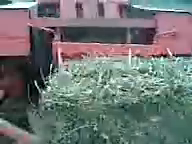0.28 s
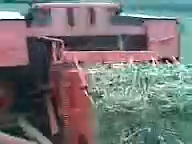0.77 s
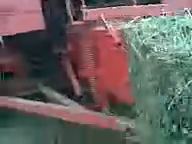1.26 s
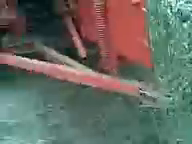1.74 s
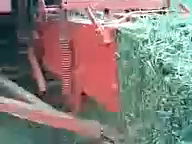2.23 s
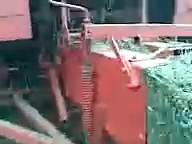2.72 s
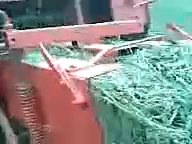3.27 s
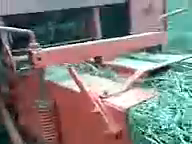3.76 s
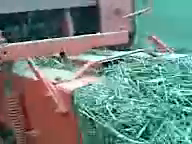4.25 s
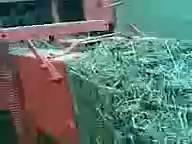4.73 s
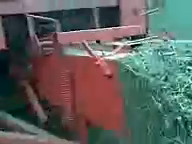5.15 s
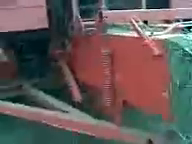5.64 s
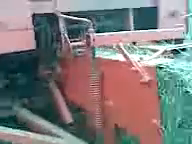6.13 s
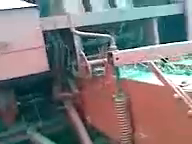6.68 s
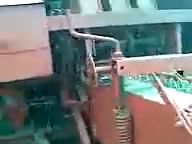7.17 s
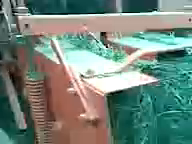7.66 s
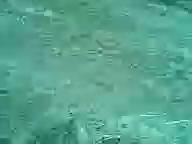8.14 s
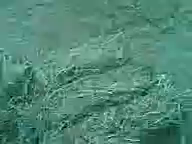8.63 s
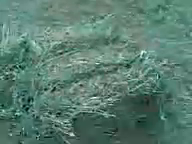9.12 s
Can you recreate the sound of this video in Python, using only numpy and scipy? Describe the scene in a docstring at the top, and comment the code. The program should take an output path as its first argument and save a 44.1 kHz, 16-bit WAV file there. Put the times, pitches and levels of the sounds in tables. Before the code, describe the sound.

A square hay baler is already running close by in a field and clatters for the whole nine and a half seconds. Metal panels rattle, chains and tines jingle, and sharp ringing clanks scatter through the noise. About every 0.7 seconds the plunger slams twice in quick succession with a hollow boom, and the rattle swells as it returns. The heaviest strokes end in a juddering, falling thump, near 1.6, 3, 4.4, 7.2, 7.9 and 8.6 seconds. Steel rubs in brief squeaks around 1.1 seconds, from 4.5 to 5.2, and again from about 7.7 to 8.1. A tractor engine drones low and faint underneath, strongest at the very start. The balance of rattles shifts slightly as the small microphone moves alongside the machine. The sound is dull, with little treble, and distorts on the hardest blows.

```python
"""A square hay baler at work, followed on foot by a small camera. Each plunger turn the machine slams twice as the hay
is packed and swells as the plunger returns: the bale chamber booms, panels rattle, chains and tines jingle, hard blows ring.
Guides squeak now and then, the tractor drones ahead. The camera is dull above 4 kHz and clips on the blows."""
import sys
import numpy as np
from scipy import signal
from scipy.fft import rfft, irfft, next_fast_len
from scipy.io import wavfile
from scipy.ndimage import map_coordinates

SR = 44100
rng = np.random.default_rng(int(sys.argv[2]) if len(sys.argv) > 2 else 0)


def wav_out(sig):
    """Save sig, one row per channel (or a flat mono array), as 16-bit PCM at SR to the path in sys.argv[1]."""
    wavfile.write(sys.argv[1], SR, np.round(np.clip(np.atleast_2d(sig).T, -1, 1) * 32767).astype(np.int16))


N = 414540

# blows: (s, peak dB, chamber dB, chains dB, t60 s, clank Hz)
BLOWS = [(0.154, -0.5, -14, -16.5, 0.089, 1081), (0.215, -7, -24, -27, 0.032, 584), (0.838, -7, -33.5, -17.5, 0.22, 1002),
         (0.943, -1, -12, -13, 0.058, 578), (1.188, -10, -5, -5, 0.067, 1250), (1.28, -6, -35, -35.5, 0.068, 1190),
         (1.549, 0.5, -29, -19.5, 0.07, 1416), (1.639, 4.5, -15.5, -10, 0.058, 908), (1.801, -6.5, -37, -11, 0.05, 1930),
         (1.942, -7, -24.5, -9, 0.05, 1384), (1.983, -9, -26.5, -27, 0.096, 1252), (2.247, -8, -17, -8.5, 0.092, 1320),
         (2.37, -3, -15, -16.5, 0.091, 1958), (2.384, -7, -9.5, -5.5, 0.051, 1250), (2.44, -7.5, -18, -6, 0.15, 786),
         (2.968, 1, -12.5, -17, 0.06, 1010), (3.007, -0.5, -13.5, -25.5, 0.09, 1123),
         (3.078, -5, -15, -13.5, 0.13, 1032), (3.324, -12, -36, -31, 0.19, 1018), (3.438, -13.5, -21, -20, 0.13, 1330),
         (3.675, -5, -10, -5, 0.085, 1417), (3.714, -2.5, -17.5, -18, 0.067, 704), (3.777, -1.5, -11, -38, 0.045, 842),
         (3.853, -5, -24, -9, 0.063, 744), (4.029, -12, -36, -9.5, 0.12, 2100), (4.06, -10.5, -19.5, -26, 0.088, 890),
         (4.387, -2.5, -8, -16, 0.15, 1490), (4.424, 1.5, 2, -16.5, 0.072, 586),
         (4.471, -7.5, -2, -4.5, 0.091, 1334), (4.524, -6.5, -20, -10, 0.078, 1054),
         (4.76, -8, -28, -16.5, 0.22, 1428), (4.797, -4.5, -20, -20, 0.13, 1352),
         (4.942, -14, -29.5, -26, 0.11, 1325), (5.059, -26, -20, -26, 0.072, 1390),
         (5.172, -4.5, -28, -6.5, 0.064, 1130), (5.415, -9, -40, -13, 0.27, 926),
         (5.884, 2, -9.5, -11.5, 0.083, 1033), (6.065, -6, -32, -14, 0.082, 1025), (6.094, -4.5, -34, -12, 0.054, 960),
         (6.125, -5.5, -34, -21, 0.13, 1075), (6.179, -7, -6, -5, 0.033, 2190),
         (6.382, -9.5, -18, -21, 0.08, 1015), (6.416, -8.5, -31, -18, 0.16, 1011), (6.493, -3, -23, -8, 0.054, 1071),
         (6.593, -10, -23, -11, 0.18, 1159), (6.621, -4.5, -5, -29, 0.071, 1135), (6.857, -6, -40, -7.5, 0.067, 1387),
         (6.946, -4.5, -25.5, -14, 0.087, 1068), (7.013, -3, -25, -21, 0.05, 1168),
         (7.215, 1, -7.5, -9.5, 0.12, 573), (7.295, -1, -3, -13, 0.12, 804),
         (7.337, 0, -4, -21.5, 0.079, 487), (7.491, -8.5, -36, -20, 0.066, 1080), (7.605, -6.5, -25.5, -17.5, 0.12, 1000), (7.67, -11.5, 0, -23, 0.055, 1186),
         (7.922, -15, -6.5, -25.5, 0.025, 1530), (7.967, 4.5, -14.5, -28, 0.045, 426), (8.048, -1, -20, -13.5, 0.069, 1463),
         (8.317, 1.5, -28, -18, 0.017, 434), 
         (8.513, -9, -19, -26.5, 0.1, 778), (8.644, 0, -16, -6.5, 0.053, 1066), (8.677, 2.5, -6.5, -31.5, 0.081, 708),
         (8.755, -6, -18, -16, 0.087, 568), (9.065, -3.5, -11, -14.5, 0.064, 756), (9.32, -13.5, -7.5, -6, 0.053, 950)]
# resonances of each part: (Hz, width Hz, dB)
CHAMBER = [(429.9, 56, -1), (531, 92, 1), (596.5, 180, 0.5), (769, 120, -1.5)]
PANELS = [(875, 195, -1.5), (974, 95, 3), (1034.5, 161, 0.5), (1175, 124, -3)]
CHAINS = [(1820, 345, -1), (2180, 368, 3), (2327, 360, 2), (2604, 260, -4)]
FIRING_HZ = 35.7
ORDERS_DB = [(2, -51.5), (3, -52), (4, -45.5), (5, -57)]  # exhaust tones: (multiple of firing rate, dB)
TRACTOR = [(0, 8.5), (1.2, -2), (2.5, -2.5), (5, -3.5), (7, -3), (9.4, -8)]  # (s, dB)
DRONE = [(15, -55.5), (25, -19), (92, 2), (168, -5.5), (243, 4), (400, -19.5), (520, -33), (880, -120)]  # (Hz, dB per Hz)
CAMERA = [(22, -10), (40, -2.5), (200, -1), (3400, 1), (3800, -3.5), (4150, -9.5), (4400, -25), (4600, -39.5), (4800, -80), (5100, -110)]  # (Hz, dB)
CLIP_AT = .705  # fixed
TOP_HZ = 15850  # fixed
FRAME = [(45, 50, -13.5), (69.6, 5.4, -6.5), (99.4, 17, -8.5), (179, 67, -5), (250.3, 75, -1.5), (358, 137, -3)]
TINES = [(2784, 348, 0.5), (3269, 324, 1), (3470, 227, 1.5), (3840, 500, -3.5), (4420, 370, -3.5)]
# steel rubbing steel for a moment: (start s, length s, Hz, width Hz, dB)
RUBS = [(0.679, 0.086, 2790, 90, -34.5), (1.081, 0.18, 3410, 350, -20), (1.083, 0.14, 2600, 600, -25), (4.451, 0.079, 1540, 50, -11.5), (4.553, 0.31, 1425, 51, -25),
        (4.783, 0.12, 1423, 50.5, -24.5), (4.873, 0.19, 1426, 38.7, -15), (5.029, 0.075, 1420, 59.5, -24), (5.164, 0.058, 2386, 121, -18.5),
        (6.324, 0.089, 1038, 61.3, -17), (6.338, 0.05, 1490, 60, -23.5), (7.678, 0.44, 1543, 60, -21.5), (7.912, 0.049, 2890, 120, -16.5),
        (6.78, 0.03, 2980, 80, -22), (8.37, 0.029, 3600, 120, -27.5)]
GUARDS = [(1256.7, 161, 0), (1410, 92, 1.5), (1484, 85, 1.5), (1642, 130, -2.5)]
# idle rattle as the camera walks round: (s, frame dB, chamber dB, panels dB, guards dB, chains dB, tines dB)
IDLE = [(0.0, -34, -29.5, -34, -34.5, -44.5, -43.5), (1.0, -50.5, -34.5, -31.5, -36.5, -48, -42.5),
        (1.2, -60, -44.5, -36, -34, -36.5, -41.5), (2.5, -44, -42, -31.0, -33.5, -28, -39),
        (4.0, -43.0, -43.5, -39.0, -37.5, -34, -40), (5.5, -36.5, -39, -32, -29.0, -28.5, -37.5),
        (7.0, -36.5, -43, -27, -29, -27.5, -40), (8.0, -37, -40, -40.5, -34, -31.5, -55),
        (8.3, -41, -28.5, -30, -46.5, -33, -35.5), (9.4, -53, -42.5, -46, -43, -33, -44)]
# packing slams, levels over the idle rattle: (s, hold s, frame dB, chamber dB, panels dB, guards dB, chains dB, tines dB)
SLAMS = [(0.155, 0.072, 6, 16, 15.5, 16.0, 9, 10), (0.263, 0.028, -8.5, 8.5, 13.5, 13.5, 16, 12),
         (0.848, 0.052, 10, 14, 10, 13.5, 11, 6), (0.95, 0.029, 8, 17.5, 13.5, 16.0, 21.5, 11),
         (1.545, 0.13, 15.5, 12.5, 7, 10.5, 5, 8.5), (1.644, 0.0092, 29.5, 32, 17.0, 20, 12, 13),
         (2.273, 0.0067, 14.5, 17, 7.5, 1.5, -14, 1), (2.372, 0.04, 12, 13.5, 9.5, 15, 5.5, 1.5),
         (2.98, 0.0086, 18.5, 28, 20.0, 10, 6.5, 12.5), (3.062, 0.068, 16.5, 11.5, 13, 11, 5, 6),
         (3.686, 0.045, 12.5, 20.5, 20.5, 11.5, 17, 12.5), (3.782, 0.041, 12, 20, 21.5, 12.5, 14.5, 7.5),
         (4.397, 0.031, 9.5, 23, 18.5, 15.5, 14, 12.5), (4.481, 0.038, 12.0, 16, 14.5, 9.5, 0.5, 7),
         (5.07, 0.024, 6.5, 13.5, 3.5, 10, -2, 3), (5.172, 0.025, 10.0, 16.5, 16.5, 9.5, 9.5, 6),
         (5.825, 0.063, 5, 16.5, 5, -8, 0.5, 5.5), (5.888, 0.0053, 9, 16.0, 14.5, 13, 10.0, 1),
         (6.498, 0.023, 13, 20.5, 6.5, 7.5, 8, 10.5), (6.589, 0.099, 6, 16.5, 7.5, 7.0, 3.5, 7),
         (7.224, 0.039, 16.5, 28, 19, 4.5, 7.5, 5), (7.292, 0.066, 15.5, 21, 13, 5, 5, 12),
         (7.932, 0.024, 17.5, 26, 17.5, 16.5, 9, 27), (8.032, 0.053, 11, 15.5, 13, 5.5, 10, 17),
         (8.654, 0.017, 19, 19.0, 23, 19.5, 16, 16), (8.74, 0.033, 16, 15, 13, 21.5, 7, 7),
         (9.345, 0.0033, 12.5, 14.5, 16.5, 4.5, 3, 9)]
# return-stroke swells, levels over the idle rattle: (peak s, rise s, frame dB, chamber dB, panels dB, guards dB, chains dB, tines dB)
SWELLS = [(0.584, 0.099, 15.5, 9, 6, 13, 13.5, 8), (1.163, 0.032, 26.5, 8, 2.5, -8, 10.5, 8),
          (1.294, 0.44, 25.5, 18, 7, 8, 1.5, 7.5), (1.4, 0.17, 11.5, -1, 7, 12, 4.5, 10.5),
          (1.996, 0.303, 15.5, 11, 15, 14.5, 5.5, 2), (2.691, 0.1, 18.5, 16.5, 13.5, 11.5, 7, 5.5),
          (3.425, 0.24, 19.5, 15.5, 16.5, 14, 5, -0.5), (3.532, 0.072, -6, 3, 14.5, 13.5, 8, 3.5),
          (4.088, 0.063, 12.5, 16, 14.5, 28, 6.5, 9.5), (4.19, 0.064, 14.5, -9, 13, 13.5, 3.5, -3.0),
          (4.794, 0.067, 11, 12.5, 13.5, 11, 1, 5.5), (4.934, 0.07, -2, 6.5, 8, 12, -6.5, -15.5),
          (5.555, 0.26, 1.5, 8, 11.5, 5.5, 4.5, 2), (6.241, 0.1, 11.5, 16, 7.5, -1, -3, 4.5),
          (6.378, 0.1, -3.5, 4, 9.5, 4.0, 4.0, 3), (6.978, 0.19, 7.5, 17, 8, 6, 2, 9),
          (7.088, 0.024, 3.5, 0, 6.5, 5.5, -19, 8.5), (7.663, 0.363, 8, 9.5, 15.5, 8.0, 1.5, 22),
          (7.795, 0.25, 11, 6.5, 14.5, 9, -9, -11), (8.382, 0.085, 14.5, 7, 7, 20.5, 4.5, 5),
          (8.504, 0.25, 4.5, 7.5, 7.5, 9.5, 4.5, -5.5), (9.038, 0.16, 15, 10.5, 14.5, 16, 3.5, 10),
          (9.175, 0.16, 16, 15, 6.5, 9, -1.5, 0)]
LOOSE_DB = .7  # fixed; each part's own unsteadiness
# the rattle drops where the plunger turns round: (s, depth dB)
LULLS = [(0.07, 5.5), (0.465, 0.5), (0.799, 7), (1.067, 8.5), (1.878, 0), (2.213, 0.5), (2.941, 1),
         (3.648, -1), (3.952, -1.5), (4.338, -0.5), (4.706, 6), (5.034, 9), (5.732, 3.5), (6.462, 2.0),
         (7.18, 1.5), (7.901, 3.5), (8.615, 1), (9.029, 8.5), (9.294, 5.5)]
LULL_S = .023
SLAM_RISE_S = 0.024  # rises and falls are times for a tenfold change
SWELL_HOLD_S = 0.018
# how each part answers, frame to tines: (lag behind a slam s, fall after a slam s, fall after a swell s)
ANSWER = [(.013, 0.088, .21), (0.0047, 0.086, .2), (-0.001, 0.091, 0.19), (-0.0053, 0.095, 0.1), (-0.01, 0.067, .13), (-0.0026, 0.055, .113)]
SWELL_FALL_S = None
STOP = 1.41  # a fall starts gently and ends steeply
# the heaviest slams end in a falling thump that stills the light parts: (s, length s, level dB, stilled by dB)
THUMPS = [(0.937, 0.08, -21.5, 1.5), (1.64, 0.063, -11.5, 6), (2.973, .05, -13.5, 1), (4.39, .055, -13.5, 1),
          (7.213, .075, -9.5, 2.5), (7.293, .072, -10.5, 2.5), (7.933, .055, -12.5, 7), (8.646, .065, -12.5, 5.5)]
THUMP_FROM_HZ, THUMP_TO_HZ, THUMP_ROUGH_DB = 1000, 280.6, 4
JUDDER_S, JUDDER_SAG = .022, .7  # a thump is a run of contacts; each drops in pitch by this share


def amp(db):
    """Decibels to gain."""
    return 10 ** (np.asarray(db) / 20)


def unit(x):
    """Scaled to rms 1."""
    return x / np.sqrt(np.mean(x ** 2) + 1e-20)


def along(points, hz):
    """(Hz, value) points on a log axis."""
    f, v = np.transpose(points)
    return np.interp(np.log(hz + 1), np.log(f + 1), v)


def curves(rows):
    """One value per sample for each column after the time."""
    s, *cols = np.transpose(rows)
    return [np.interp(np.arange(N) / SR, s, c) for c in cols]


def wobble(rate):
    """A smooth random curve, rate knots a second."""
    return map_coordinates(rng.standard_normal(int(N * rate / SR) + 4), [np.arange(N) * rate / SR])


def filtered(x, response):
    """x times a complex response of frequency."""
    m = next_fast_len(N + SR // 2)
    return irfft(rfft(x, m) * response(np.fft.rfftfreq(m, 1 / SR)), m)[..., :N]


def hum(modes):
    """Noise ringing in a part's resonances."""
    body = lambda f: sum(amp(db) * 1j * f * w / (c * c - f * f + 1j * f * w) * (-1) ** k for k, (c, w, db) in enumerate(modes))
    return unit(filtered(rng.standard_normal(N), lambda f: body(f) ** 2))


def taps(modes, count, cycles, spread_db):
    """Small loose contacts, each ringing briefly near one resonance."""
    u = rng.random((count, 4))
    hz, width, db = np.array(modes)[(u[:, 0] * len(modes)).astype(int)].T[:, :, None]
    hz = hz + width * (u[:, 1:2] - .5)
    t = np.arange(1000) / SR  # fixed
    size = amp(db - spread_db * np.log(u[:, 2:3] + 0.072)) * np.cos(t / t[-1] * np.pi / 2)
    ring = size * np.sin(2 * np.pi * hz * t) * np.exp(-t * hz / cycles) * (1 - np.exp(-t * hz / 0.85)) ** 2
    at = (u[:, 3:] * N).astype(int) + np.arange(len(t))
    return unit(np.bincount(at.ravel(), ring.ravel())[:N])


def jolts():
    """The power that the blows add to each part, and the clank of each blow itself."""
    power, clank, t = np.zeros((6, N + SR)), np.zeros(N + SR), np.arange(SR // 4) / SR
    for s, db, chamber_db, chains_db, t60, hz in BLOWS:
        # a blow is a short scuffle of contacts: it strikes at once and then dies away steadily
        shape = amp(db - 3.0 - 60 * (t / np.clip(t60, .02, .2)) ** 1.03) * (1 - np.exp(-t / 0.00082))
        # the heavy parts take some milliseconds to answer
        heavy = amp(chamber_db) * shape * (1 - np.exp(-t / 0.014))
        light = amp(chains_db) * shape
        parts = [amp(-4.5) * heavy, amp(4.0) * heavy, amp(-14.0) * shape, amp(-15.5) * shape, amp(-3.5) * light, amp(-8.0) * light]
        power[:, round(s * SR):][:, :len(t)] += np.square(parts)
        clank[round(s * SR):][:len(t)] += amp(-3.0 - 60 * t / 0.22) * shape * np.sin(2 * np.pi * hz * t)
    return power[:, :N], clank[:N]


def baler():
    """Each part rattles as hard as the stroke and the blows shake it."""
    jolt, clank = jolts()
    frame, chamber, panels, guards, chains, tines = np.sqrt(amp(shake() + slack()) ** 2 + jolt)
    boom = unit(taps(CHAMBER, count=1200, cycles=4.6, spread_db=0.0) + 0.81 * hum(CHAMBER))
    rattle = unit(taps(PANELS, count=1400, cycles=17, spread_db=2.0) + 0.95 * hum(PANELS))
    chatter = unit(taps(GUARDS, count=1400, cycles=13, spread_db=1.0) + 0.85 * hum(GUARDS))
    jingle = unit(taps(CHAINS, count=2500, cycles=9, spread_db=4.0) + 1.15 * hum(CHAINS))
    tick = unit(taps(TINES, count=900, cycles=5, spread_db=2.5) + 2.0 * hum(TINES))
    thump, still_db = thumps()
    light = panels * rattle + guards * chatter + chains * jingle + tines * tick
    parts = frame * hum(FRAME) + chamber * boom + amp(still_db) * light
    # looseness makes the whole machine stutter together
    return amp(1.33 * wobble(45)) * parts + clank + thump


def squeak():
    """Each rub is a rough tone that swells and fades."""
    out, hiss = np.zeros(N), rng.standard_normal(N)
    for s, length, hz, width, db in RUBS:
        span = slice(round(s * SR), round((s + length) * SR))
        tone = unit(signal.lfilter(*signal.iirpeak(hz, hz / width, SR), hiss[span]))
        out[span] += amp(db - 5.0) * np.hanning(len(tone)) ** .5 * tone
    return out


def tractor():
    """Exhaust tones on a low rumble."""
    phase = 2 * np.pi * np.cumsum(FIRING_HZ * (1 + 0.021 * wobble(2.8))) / SR
    tones = sum(amp(db - 1.5 + 5.4 * wobble(10)) * np.sin(k * phase + k * k) for k, db in ORDERS_DB)
    rumble = unit(filtered(rng.standard_normal(N), lambda hz: amp(along(DRONE, hz))))
    return amp(curves(TRACTOR)[0]) * (tones + amp(-40.0 + 3.8 * wobble(10)) * rumble)


def slack():
    """Just before a blow the parts coast through their free play and the rattle drops (dB)."""
    s, db = np.transpose(BLOWS)[:2]
    before = np.arange(N) / SR
    k = np.clip(np.searchsorted(s, before), 0, len(s) - 1)
    wait = s[k] - before
    return -np.clip(5.5 + 0.2 * db[k], 0, 12) * np.exp(-np.abs(wait) / 0.014) * (wait > 0)


def heave(t, s, rise, hold, fall, over_db):
    """Power over idle of one part: each heave rises, holds and falls."""
    late = t - s[:, None]
    shape_db = -20 * (np.maximum(-late, 0) / np.maximum(rise, .01) + (np.maximum(late - hold, 0) / fall) ** STOP)
    return amp(over_db) ** 2 @ amp(shape_db) ** 2


def shake():
    """How hard each part is shaken (dB): the idle rattle lifted by slams and swells, dropped in lulls."""
    slams, swells, t = np.array(SLAMS), np.array(SWELLS), np.arange(0, N / SR + .01, .003)  # fixed
    lull_db = sum(db * np.exp(-((t - s) / LULL_S) ** 2) for s, db in LULLS)
    rows = []
    for k, (lag, slam_fall, swell_fall) in enumerate(ANSWER):
        power = 1 + heave(t, slams[:, 0] + lag, SLAM_RISE_S, slams[:, 1:2], slam_fall, slams[:, k + 2])
        power = power + heave(t, swells[:, 0], swells[:, 1:2], SWELL_HOLD_S, swell_fall, swells[:, k + 2])
        rows.append(np.interp(np.arange(N) / SR, t, 10 * np.log10(power) - lull_db) + LOOSE_DB * wobble(14))
    return np.array(curves(IDLE)) + rows


def thumps():
    """The juddering, falling tone of each thump, and how far it stills the light parts (dB)."""
    tone, still_db, uneven = np.zeros(N), np.zeros(N), 1 + .25 * wobble(40)
    for s, length, db, stilled_db in THUMPS:
        u = np.linspace(0, 1, round(length * SR))
        contact = np.cumsum(uneven[round(s * SR):][:len(u)]) / SR / JUDDER_S % 1
        hz = THUMP_FROM_HZ * (THUMP_TO_HZ / THUMP_FROM_HZ) ** u ** 0.92 * (1 + JUDDER_SAG * (.5 - contact))
        shape = np.sin(np.pi * u) ** 0.67 * np.sin(np.pi * contact ** .6) ** 1.1
        tone[round(s * SR):][:len(u)] = amp(db) * shape * np.sin(2 * np.pi * (np.cumsum(hz) / SR + rng.random()))
        still_db[round(s * SR):][:len(u)] = -stilled_db * np.clip(4 * u - .6, 0, 1) * np.clip(12 * (1 - u), 0, 1)
    return amp(THUMP_ROUGH_DB * wobble(110)) * tone, still_db


def scene():
    """Everything reaches one microphone."""
    return (baler() + squeak() + tractor())[None]


def record(dry):
    """The preamp squeezes the peaks, the path is dull, hard clipping spits treble, then the band limit."""
    squeezed = dry / (1 + np.abs(dry / 1.06) ** 3) ** (1 / 3)
    dull = filtered(squeezed, lambda hz: amp(along(CAMERA, hz)))
    return filtered(np.clip(dull, -CLIP_AT, CLIP_AT), lambda hz: np.clip((TOP_HZ - hz) / 300, 0, 1))  # fixed


dry = scene()
out = record(dry)
wav_out(out)
```